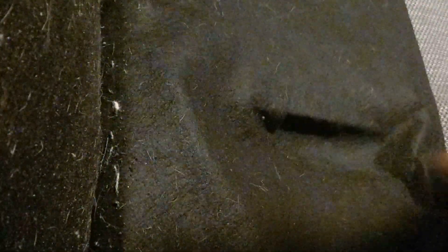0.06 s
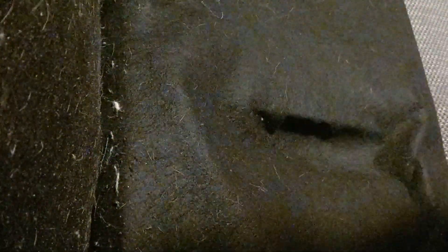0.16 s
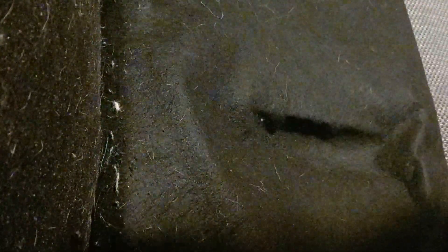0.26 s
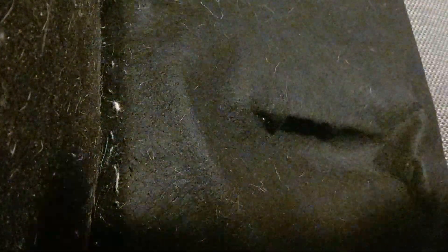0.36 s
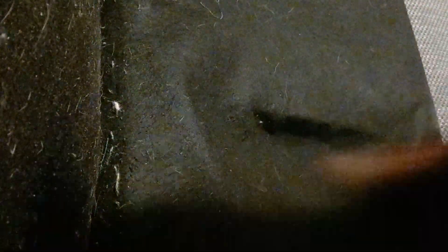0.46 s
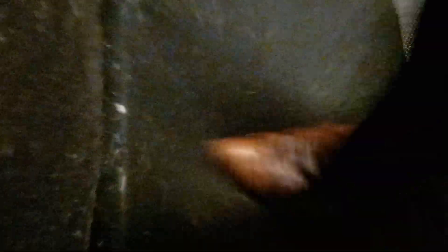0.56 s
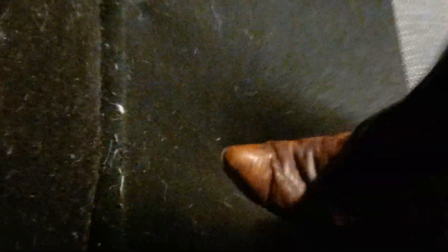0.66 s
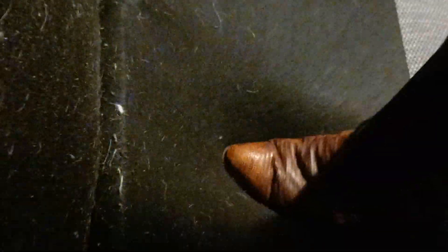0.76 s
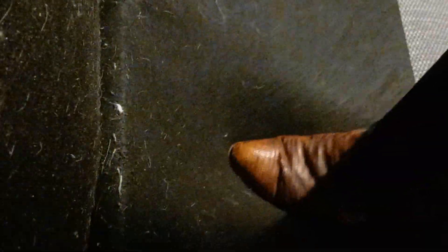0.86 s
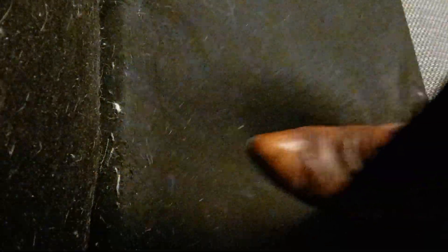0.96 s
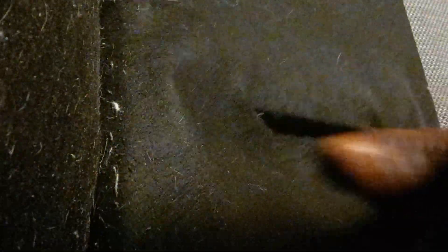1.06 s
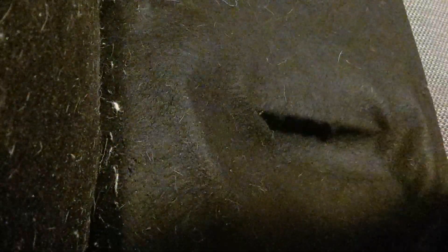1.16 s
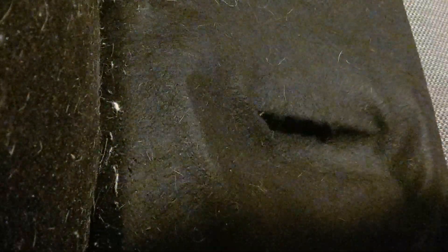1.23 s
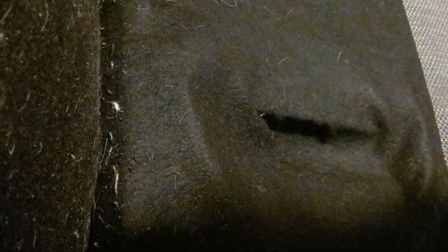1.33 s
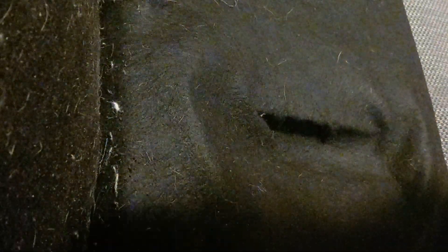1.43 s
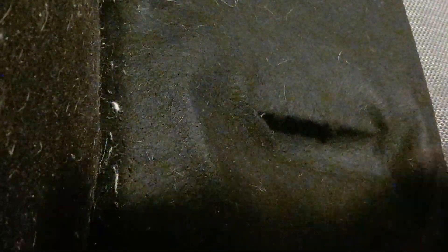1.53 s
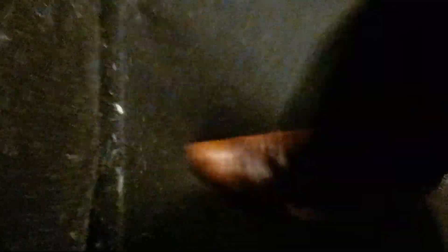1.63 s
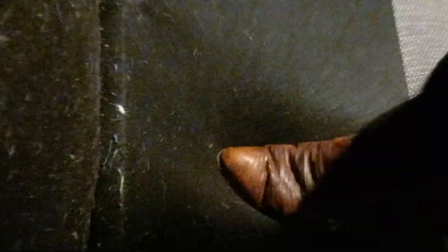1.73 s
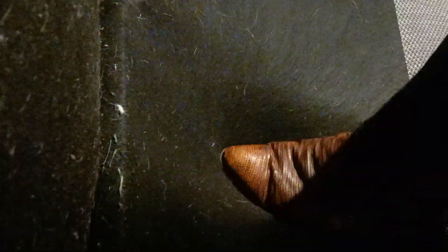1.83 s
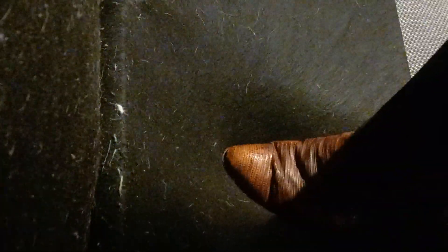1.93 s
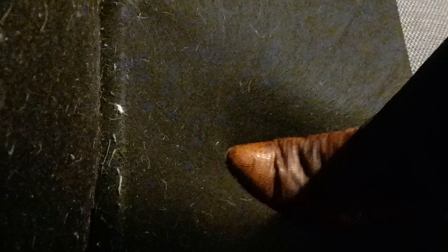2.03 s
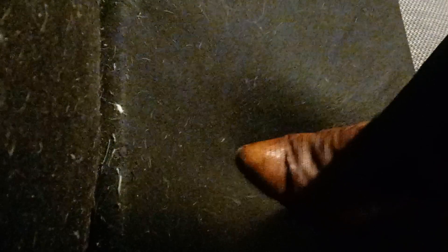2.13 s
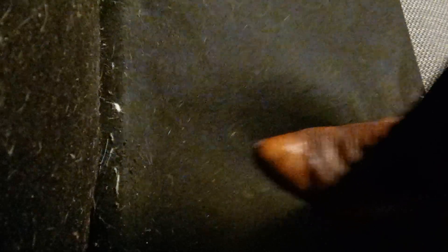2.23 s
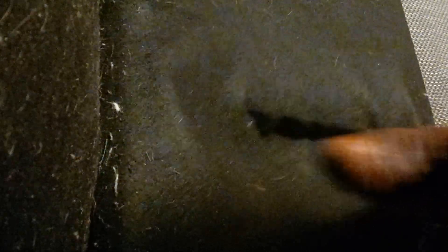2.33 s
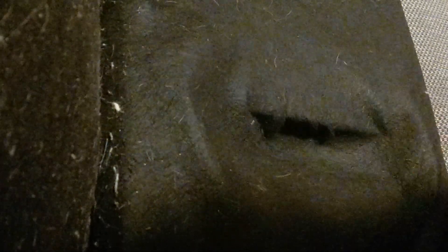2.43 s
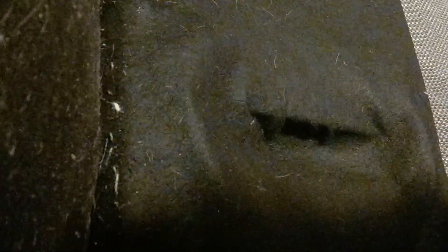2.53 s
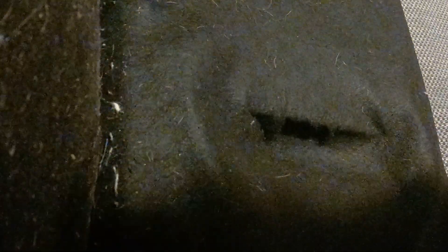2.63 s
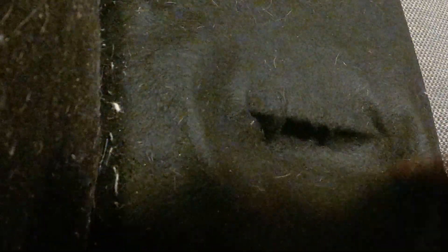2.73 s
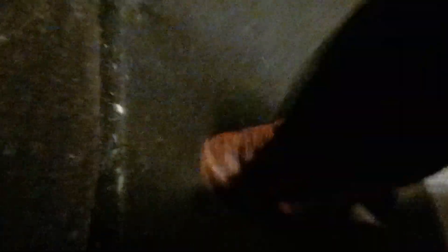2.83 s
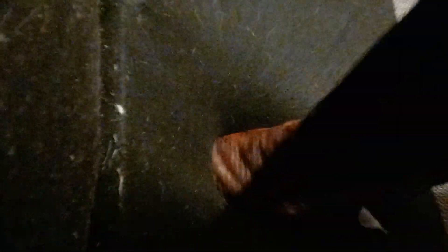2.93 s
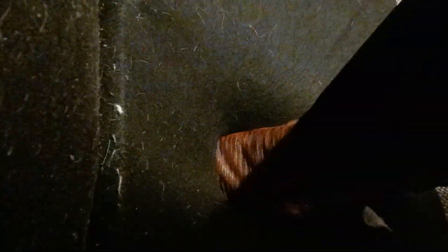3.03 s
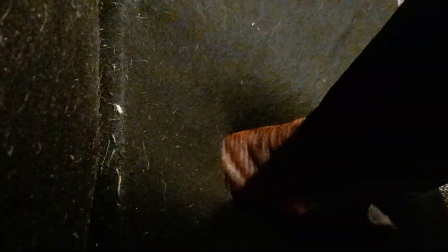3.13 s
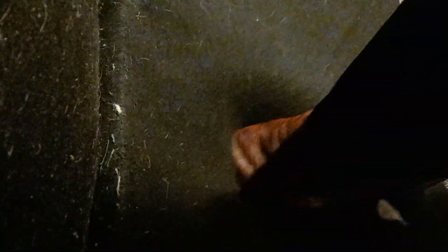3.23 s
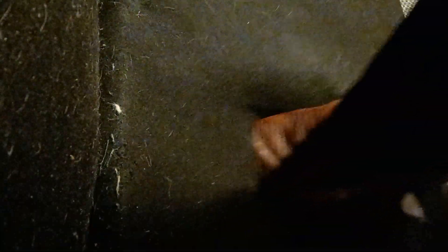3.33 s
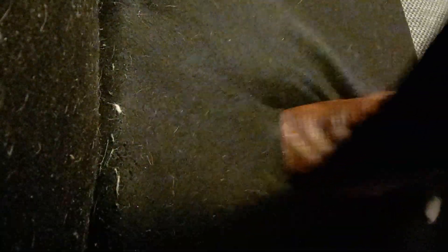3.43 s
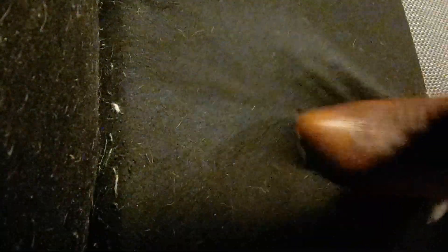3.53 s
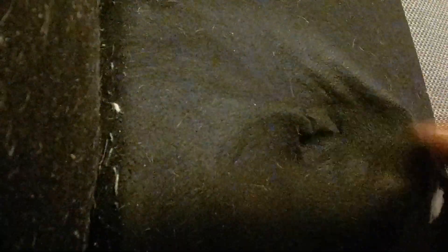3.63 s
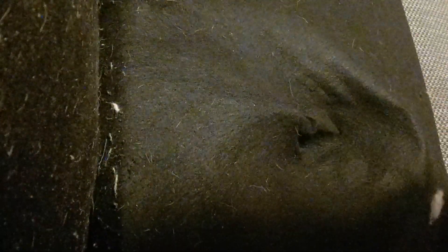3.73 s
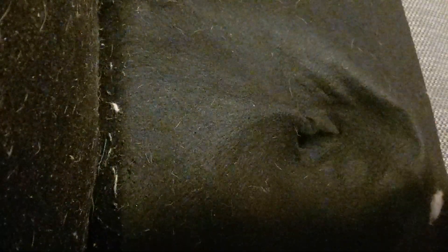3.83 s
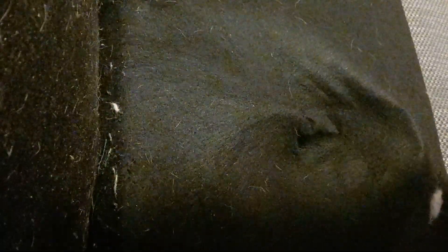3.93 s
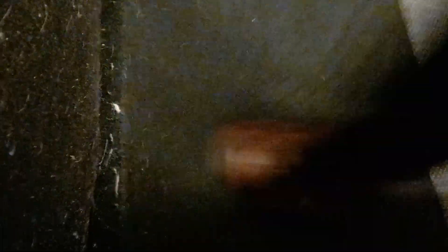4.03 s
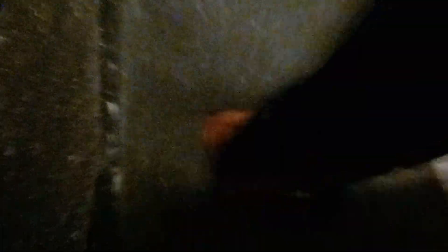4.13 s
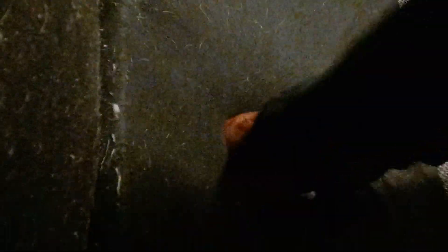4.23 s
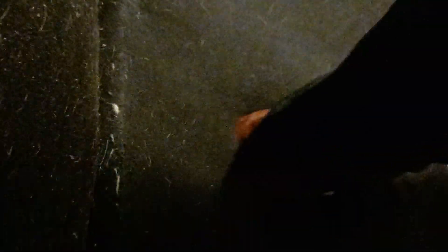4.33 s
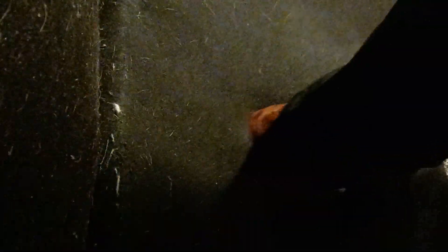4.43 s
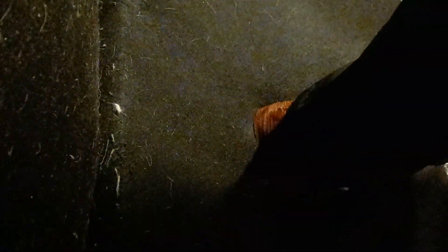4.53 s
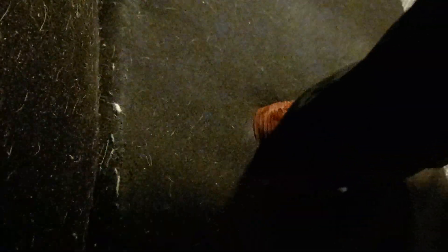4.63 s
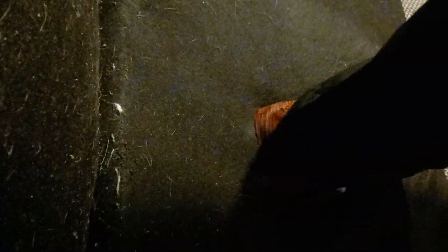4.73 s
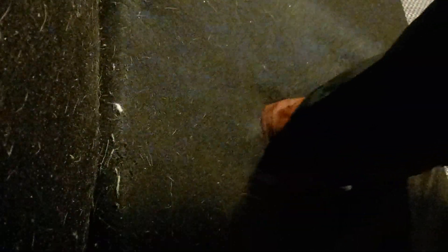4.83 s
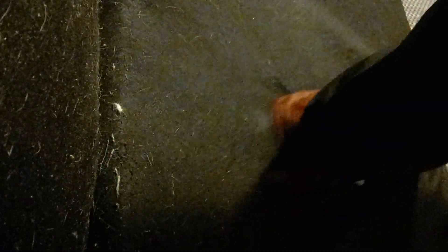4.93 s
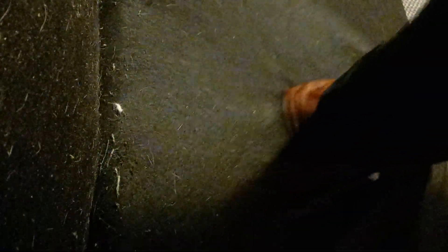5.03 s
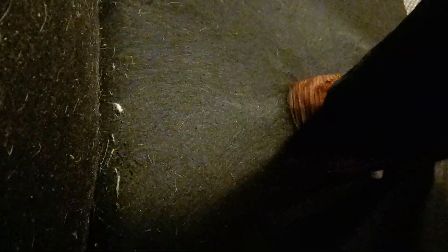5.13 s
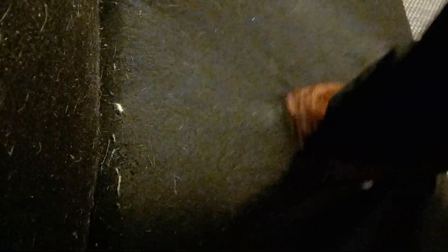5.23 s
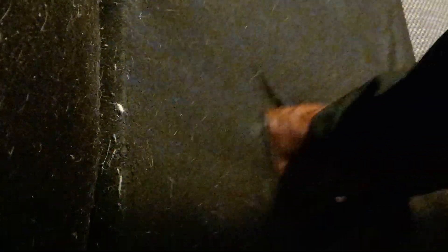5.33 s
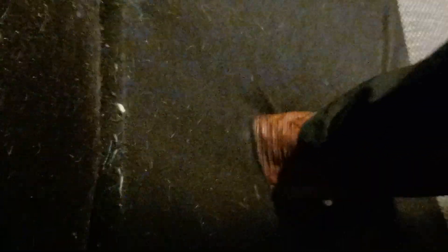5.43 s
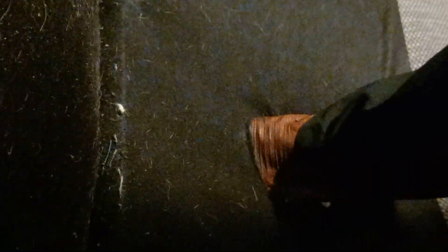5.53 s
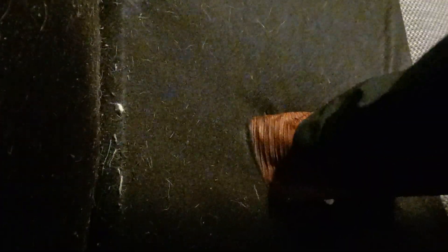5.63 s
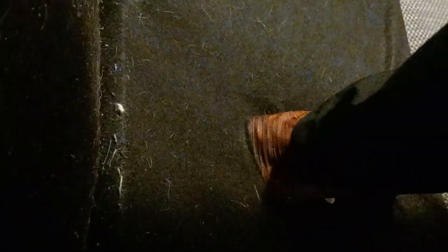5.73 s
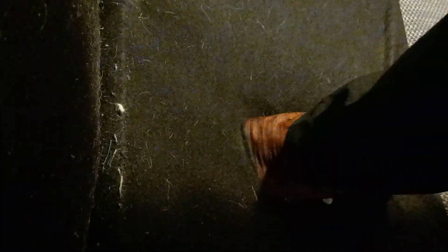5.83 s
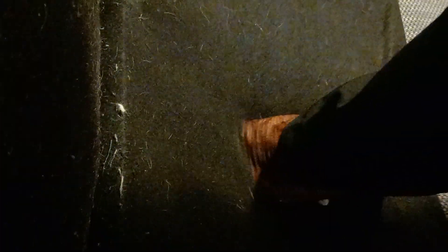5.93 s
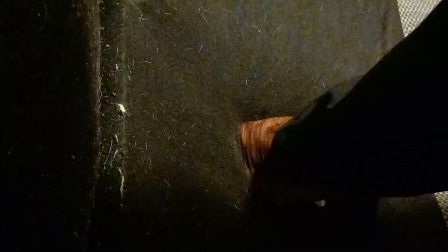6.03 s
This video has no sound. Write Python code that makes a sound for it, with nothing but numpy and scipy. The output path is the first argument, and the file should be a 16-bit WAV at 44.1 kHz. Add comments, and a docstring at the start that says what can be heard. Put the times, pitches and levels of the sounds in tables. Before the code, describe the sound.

Close, crunching stomps of a shoe into a sprung seat, with cloth rustle, dull thuds, hard frame knocks and low wind-like rumble.

```python
"""In a small room, a leather shoe stomps four times on a sprung cushion close to a two-port microphone.
Each stomp crunches stuffing and springs, as bursts of shaped noise, over a dull low-noise thud; short low
swings knock the frame, hardest in the last two stomps, and set decaying spring modes ringing.
Cloth rustles as modulated noise when the foot moves, springs and leather tick as short filtered snaps,
and moving air rumbles at both ports and buffets chiefly the left, over a faint background hush."""
import sys
import numpy as np
from scipy import signal
from scipy.fft import rfft, irfft
from scipy.io import wavfile
from scipy.ndimage import uniform_filter1d

SR = 44100
rng = np.random.default_rng(int(sys.argv[2]) if len(sys.argv) > 2 else 0)


def log_audio(samples):
    """Write samples as a 16-bit WAV file to the path given in sys.argv[1]."""
    # one column per channel
    frames = np.atleast_2d(samples).T
    # limit to full scale, then quantise
    limited = np.clip(frames, -1, 1)
    pcm = np.round(limited * 32767).astype(np.int16)
    wavfile.write(sys.argv[1], SR, pcm)


N = 267371
TIME = np.arange(N) / SR

# Likeness of the sound at the two ports. Each row: frequency in hertz, correlation from 0 to 1.
LIKENESS = [(60, 0.78), (150, 0.79), (300, 0.91), (650, 0.8), (1200, 0), (2500, 0.31), (4500, 0.036),
            (16000, 0)]


def amp(db):
    """Converts decibels to an amplitude ratio by the logarithmic law."""
    return 10 ** (np.asarray(db) / 20)


def evened(x):
    """Normalizes the mean power, giving an rms of 1."""
    return x / np.sqrt(np.mean(x ** 2) + 1e-20)


def read(points, hz):
    """Interpolates a spectrum table along a logarithmic frequency axis."""
    f, value = np.transpose(points)
    return np.interp(np.log(hz + 1), np.log(f + 1), value)


def colour(x, points):
    """Filters with zero phase, by a table of frequency in hertz and gain in decibels."""
    gain = amp(read(points, np.fft.rfftfreq(N, 1 / SR)))
    return irfft(rfft(x) * gain, N)


def add(mix, s, sound):
    """Superposes a sound on the mix from time s in seconds."""
    part = mix[..., max(round(s * SR), 0):][..., :sound.shape[-1]]
    part += sound[..., :part.shape[-1]]


def at_ports(pair, points):
    """Blends two unrelated signals to a partial coherence between ports, highest in the bass."""
    # Level difference, left minus right. Each row: frequency in hertz, difference in dB.
    lean_points = [(60, 9), (250, 0.5), (700, 0.5), (1200, -2), (2500, 3.5), (4000, 0.5), (5500, 0),
                   (7400, 4.5), (8500, -2.5), (10000, -5), (15000, -2.5)]
    hz = np.fft.rfftfreq(N, 1 / SR)
    a, b = rfft(pair)
    same = np.clip(read(LIKENESS, hz), -1, 1)
    lean = amp(read(lean_points, hz) / 2)
    left = a * lean
    right = (same * a + np.sqrt(1 - same ** 2) * b) / lean
    return evened(irfft(np.array([left, right]) * amp(read(points, hz)), N))


def flutter(hz, depth_db):
    """Random amplitude modulation: a gain through hz independent levels a second."""
    knots = rng.standard_normal(N // 20)
    return amp(depth_db * np.interp(TIME * hz, np.arange(len(knots)), knots))


def steadied(x, seconds):
    """Divides by the short-term rms, which evens out swells longer than the given time."""
    power = uniform_filter1d((x ** 2).mean(0), max(int(seconds * SR), 2))
    return x / np.sqrt(abs(power) + 1e-6)


def grains(per_s, spread_db, hiss):
    """Friction as a random train of tiny slips of uneven size over a smooth hiss."""
    sizes = amp(spread_db * np.minimum(rng.exponential(1, N), 4))
    slips = (rng.random(N) < per_s / SR) * sizes
    return evened(slips * rng.standard_normal((2, N))) + hiss * rng.standard_normal((2, N))


def push(s, hz, cycles):
    """A pressure pulse: a cosine under a Gaussian envelope centred on time s."""
    turns = (TIME - s) * hz
    near = abs(turns) < 4
    out = np.zeros(N)
    out[near] = np.cos(2 * np.pi * turns[near]) * np.exp(-(turns[near] / cycles) ** 2)
    return out


def press(s, rise_s, hold_s, fade_s, touch_db):
    """Level of a load growing from touch_db to full, held, then decaying 20 dB in each fade_s."""
    t = TIME - s
    growth_db = touch_db * np.clip(1 - t / rise_s, 0, 1)
    fade_db = -20 * np.maximum(t - rise_s - hold_s, 0) / fade_s
    onset = np.clip(t / 0.0015, 0, 1)  # 1.5 ms
    return onset * amp(growth_db + fade_db)


def swell(s, rise_s, fade_s, roundness):
    """An envelope that climbs 20 dB in rise_s to its peak at s and decays 20 dB in fade_s."""
    away = np.clip(np.maximum((s - TIME) / rise_s, (TIME - s) / fade_s), 0, 10)
    return amp(-20 * away ** roundness)


def hush():
    """Stationary background: steady Gaussian noise of fixed spectrum."""
    # Background spectrum. Each row: frequency in hertz, relative level in dB.
    hush_points = [(30, 8), (150, 1.5), (400, -3.5), (650, -0.5), (1000, -12), (2200, -24.5), (7500, -23.5),
                   (9500, -37), (16000, -37)]
    return amp(-58) * at_ports(rng.standard_normal((2, N)), hush_points)


def draught(movement):
    """Turbulence: eddies rumble unrelated at each port, stirred further by the moving foot."""
    # Spectrum of the eddies. Each row: frequency in hertz, gain in dB.
    air_points = [(20, -46), (38, -3), (60, -7), (95, 5), (140, -2.5), (220, -10), (350, -22), (600, -33.5),
                  (1200, -46.5), (3000, -75.5)]
    # Slow level of the draught at the left port. Each row: time in seconds, level in dB.
    left_curve = [(0, -26.5), (.42, -29), (.75, -39), (.9, -34), (1.15, -29.5), (1.35, -37.5),
                  (1.55, -28.5), (2, -34), (2.5, -28), (2.8, -30), (3.18, -43.5), (3.4, -35.5),
                  (3.72, -42.5), (3.9, -32.5), (4.48, -39), (4.75, -30), (5.1, -33), (5.8, -31)]
    # Slow level of the draught at the right port. Each row: time in seconds, level in dB.
    right_curve = [(0, -39), (.22, -55), (.44, -36.5), (.95, -44.5), (1.24, -30), (1.35, -51),
                   (1.75, -33.5), (2.1, -55), (2.45, -40), (2.75, -42.5), (3.18, -56), (3.35, -38),
                   (3.62, -55), (4.3, -36), (4.54, -57), (4.75, -44), (5.2, -48), (5.75, -32.5),
                   (6.05, -45)]
    wake_db, wake_lag_s = (-2, 7), 0.03  # left and right, over the level of the movement
    steady = amp([np.interp(TIME, *np.transpose(curve)) for curve in (left_curve, right_curve)])
    wake = amp(wake_db)[:, None] * np.interp(TIME - wake_lag_s, TIME, movement)
    rumble = colour(rng.standard_normal((2, N)), air_points)
    eddies = steadied(rumble * flutter(hz=44.97, depth_db=5), seconds=0.084)
    return np.hypot(steady, wake) * eddies


def buffets():
    """Pressure of strong gusts: single swings, chiefly at the left port, amid finer eddies."""
    # Gusts. Each row: centre in seconds, level in dB and pitch in hertz, both before the scaling below.
    gust_rows = [(0.246, -24, 140), (0.287, -18, 128), (0.313, -15, 175), (.331, -4.5, 178),
                 (0.42, -18, 114), (1.129, -14, 163), (1.164, -16, 187), (1.197, -20, 133),
                 (1.483, -19, 182), (1.577, -10, 188), (2.187, -17, 149), (2.281, -14.5, 174),
                 (2.671, -16.5, 167), (2.759, -15, 137), (3.079, -17, 199), (3.316, -14.5, 137),
                 (3.619, -22.5, 182), (3.897, -18.5, 164), (4.315, -19, 112), (4.523, -19.5, 170.5),
                 (4.549, -11, 135), (4.571, -15, 171), (4.7, -19, 114), (4.847, -14, 210),
                 (5.02, -9.5, 150), (5.496, -12.5, 183), (5.541, -17.5, 121), (5.89, -13.5, 155)]
    swings, knots = np.zeros((2, N))
    for s, db, hz in gust_rows:
        swings += amp(db) * push(s, hz * 0.89, cycles=0.57)
        knots += amp(db) * np.exp(-abs(TIME - s) / 0.012)
    fine = evened(colour(rng.standard_normal(N),
                         [(60, -4.5), (150, 3), (280, 0), (420, -10), (650, -28.5), (1300, -72)]))
    port_gain = amp([[-2.5], [-22]])  # left, right
    return port_gain * (swings + amp(-12) * knots * fine)


def rubbing():
    """Summed powers of the rubs give the levels of the foot's movement and of its fizz."""
    # Rubs. Each row: peak in seconds, level in dB, length between the points 20 dB down in seconds,
    # fizz relative to the rub in dB.
    rub_rows = [(.01, -54.5, .2, 1.5), (0.208, -56.5, 0.43, 2), (0.43, -58.5, 0.45, 1),
                (0.915, -63, 0.52, 0), (1.031, -45.5, 0.23, -2), (1.232, -64, .8, 4.5),
                (1.53, -64, 0.31, 1.5), (2.135, -57, 0.41, -2.5), (2.28, -46, 0.18, -3),
                (2.351, -49.5, 0.19, -0.5), (2.525, -64, .45, 4.5), (2.74, -66, 0.3, 2),
                (3.168, -69, 0.43, 1), (3.362, -54, .3, -3), (3.495, -51, 0.24, -2.5),
                (3.792, -60.5, 0.24, 0), (3.974, -68.5, 0.39, 0.5), (4.254, -54.5, 0.11, -3),
                (4.405, -57.5, 0.32, -6.5), (5.007, -67, 0.54, -0.5), (5.3, -59, 0.37, -7),
                (5.43, -55, 0.27, 1.5), (5.683, -67, 0.54, 2.5), (6.012, -59.5, 0.51, 4.5)]
    rise_share, roundness = 0.49, 1.65  # roundness 1 is a pointed peak
    body, fizz = np.zeros((2, N))
    for s, db, length, fizz_db in rub_rows:
        rub = amp(db) * swell(s, rise_share * length, (1 - rise_share) * length, roundness)
        body += rub ** 2
        fizz += (rub * amp(fizz_db)) ** 2
    return np.sqrt(body), np.sqrt(fizz)


def rustle(movement, fizz):
    """Sliding friction of trouser cloth and leather on the cover, its treble weighted apart."""
    # Spectrum of rubbed cloth. Each row: frequency in hertz, relative level in dB.
    cloth_points = [(150, -4), (550, 11), (1000, 4.5), (2200, -0.5), (3600, 2.5), (5500, 2), (7700, 2.5),
                    (9200, -10), (14000, -8.5), (16000, -12)]
    slips = grains(per_s=3500, spread_db=1, hiss=1) * flutter(hz=83.5, depth_db=1.45)
    fibres = at_ports(slips, cloth_points)
    top = colour(fibres, [(4000, -41.5), (9000, 0)])
    return amp(3.5) * (movement * (fibres - top) + fizz * top)


def faint_ticks(count):
    """Random releases scattered while the foot leans on the springs, as (s, dB, Hz)."""
    times = rng.uniform(5.6, 6.06, count)  # seconds
    chances = rng.standard_normal((count, 2))
    # levels spread by 4 dB, pitches by a quarter octave
    return [(s, -39 + 4 * loud, 5500 * 2 ** (0.25 * high)) for s, (loud, high) in zip(times, chances)]


def ticks():
    """Stick-slip release: loaded springs and creased leather let go with a snap and a short fizz."""
    # Ticks. Each row: time in seconds, level in dB before the common 1 dB boost, pitch in hertz.
    tick_rows = [(0.4935, -27.5, 2500), (2.0557, -28, 5800), (2.7793, -27, 2720), (2.8466, -18.5, 1700),
                 (2.8786, -35, 6030), (3.468, -29.5, 2450), (4.022, -30.5, 2160), (4.055, -22, 7000),
                 (4.0802, -14, 2960), (4.421, -38.5, 4500), (4.444, -34, 4370), (5.1475, -42.5, 5600),
                 (5.443, -41, 4500), (5.6044, -42, 5070), (5.7578, -41.5, 4660), (5.82, -43, 5600),
                 (5.9023, -20, 3520), (6.048, -33, 5000)]
    # Spectrum of a snap. Each row: frequency in hertz, gain in dB.
    snap_points = [(300, -22), (1300, 11.5), (2000, -4.5), (3500, 0), (5000, -3), (8000, 0), (9500, -15.5),
                   (16000, -16)]
    out, t = np.zeros((2, N)), TIME[:4096]
    hz = np.fft.rfftfreq(len(t), 1 / SR)
    lead = 64  # samples left for the part of the zero-phase filter that precedes the release
    for s, db, pitch in tick_rows + faint_ticks(count=4):
        octaves_away = np.log2((hz + 1) / pitch)
        band = amp(read(snap_points, hz)) / np.sqrt(1 + (2 * octaves_away) ** 2)
        decay = np.exp(-t / 0.0008) + amp(-24) * np.exp(-t / 0.006)
        slips = rng.standard_normal((2, len(t))) * decay
        slips[:, 0] = 4  # the release itself reaches both ports
        snap = irfft(rfft(np.roll(slips, lead, axis=1)) * band)
        add(out, s - lead / SR, amp(db + 1) * snap / abs(snap).max())
    return out


def chatter(count):
    """Repeated impact: the frame bounces under the sole in ever weaker, lower knocks."""
    start_s, gap_s, first_db, first_hz, ring_db = 4.0812, 0.0083, -4, 515, -13
    fade_db_per_s, sag_oct_per_s = 220.5, 30
    return [(start_s + t, first_db - fade_db_per_s * t, first_hz * 2 ** (-sag_oct_per_s * t), ring_db)
            for t in np.arange(count) * gap_s]


def knocks():
    """Impact and modal decay: each knock is a low swing, a seat shudder and ringing springs."""
    # The sole meets a spring or bottoms out on the frame. Each row: time in seconds, level of the low
    # swing in dB, pitch in hertz, drive to the seat and springs relative to the swing in dB.
    knock_rows = [(0.5052, -21, 263, -28), (0.53, -11, 230, -40), (.609, -21, 533, -19),
                  (1.6045, -18, 222, -25.5), (1.633, -23, 347, -21), (1.705, -27, 600, -24),
                  (2.0557, -34, 597, 5.5), (2.8465, -3.5, 430, -1.5), (2.8475, -14.5, 1024, -23),
                  (2.866, -14, 376, -13), (3.4709, -33, 540, -8), (4.0725, -12, 703, -16),
                  (4.0755, -10.5, 1160, -5.5), (4.117, -6, 264, -20), (4.119, -14, 780, -15),
                  (4.1504, -11.5, 117.8, -32), (5.0161, -28.5, 523, -13.5), (5.444, -40.5, 700, -13)]
    # Modes of springs and frame. Each row: frequency in hertz, level in dB, time to decay 60 dB in seconds.
    spring_modes = [(199.6, -24.5, 0.5), (260.6, -23.5, 0.5), (360, -24, 0.46), (390.5, -25, 0.72),
                    (405, -23, 0.76), (426, -30, 0.6), (446, -31, 0.69), (455, -50, 0.55), (587, -39, 0.87),
                    (620, -34.5, 0.71), (650, -36, 0.19), (880, -47, 0.27), (1630, -62, 0.6)]
    # Spectrum of the whole seat just after a knock. Each row: frequency in hertz, relative level in dB.
    seat_points = [(150, -5), (280, -3), (450, 9), (620, 3), (900, -5), (1400, -29.5), (2500, -26),
                   (6000, -54), (12000, -59)]
    blows, kicks = np.zeros((2, N))
    for s, db, hz, ring_db in knock_rows + chatter(count=4):
        # the harder the knock, the sharper its edge
        edge = amp(-8.5) * amp(db * 0.37) * push(s, hz * 2.06, cycles=0.27)
        blows -= amp(db) * (push(s, hz, cycles=0.68) + edge)
        add(kicks, s, amp([db + ring_db]))
    t = TIME[:SR]
    ring = sum(amp(db - 60 * t / t60) * np.sin(2 * np.pi * hz * t) for hz, db, t60 in spring_modes)
    fading = amp(-15.5) * np.exp(-t / 0.012) + amp(-24) * np.exp(-t / 0.11)
    # the powers of overlapping shudders add
    shudder_level = np.sqrt(abs(signal.fftconvolve(kicks ** 2, fading ** 2)[:N]))
    shudder = shudder_level * at_ports(rng.standard_normal((2, N)), seat_points)
    return blows + shudder + signal.fftconvolve(kicks, ring)[:N]


def stomps():
    """Compression: slips crunch as the sole sinks and settles, the padding puffs, the seat thuds."""
    # Stomps. Each row: touch of the sole in seconds, travel in seconds, crunch in dB, treble gain as the
    # stuffing packs in dB, delay of settling in seconds, settling in dB, creep in dB, thud in dB before
    # the cut below, thud rise in seconds, thud fade by 20 dB in seconds.
    stomp_rows = [(.492, 0.04, -24, 0, 0.12, -34.5, -38.5, -17, 0.022, 0.099),
                  (1.587, 0.04, -24.5, 0.5, 0.12, -35.5, -38.5, -19, 0.022, 0.15),
                  (2.777, .042, -26.5, 1.5, 0.11, -48, -60, -17, 0.048, 0.12),
                  (4.021, 0.061, -25.5, -4.5, 0.16, -38.5, -39.5, -16.5, 0.088, 0.047)]
    # Spectrum of the crunch. Each row: frequency in hertz, relative level in dB.
    crunch_points = [(300, -30), (900, 2), (1600, 1.5), (2300, -3), (3400, 0), (4600, -0.5), (6000, 0),
                     (7000, 0.5), (7800, 1.5), (8400, -5.5), (9100, -12), (12500, -10.5), (16000, -12)]
    # Spectrum of the padding. Each row: frequency in hertz, relative level in dB.
    padding_points = [(100, -42), (250, 3.5), (450, -2), (680, -6.5), (900, -13), (1500, -56), (3000, -42)]
    # Spectrum of the thud. Each row: frequency in hertz, relative level in dB.
    thud_points = [(20, -37), (45, -4), (70, 5), (115, 4), (200, 2.5), (300, -6.5), (600, -52)]
    touch_db, hold_s = -20, 0.019
    crush, bright, weight = np.zeros((3, N))
    for (s, travel_s, crunch_db, treble_db, settle_s, settle_db, creep_db,
         thud_db, thud_rise_s, thud_fade_s) in stomp_rows:
        sink = amp(crunch_db) * press(s, travel_s, hold_s, 0.018, touch_db)
        settle = amp(settle_db) * swell(s + settle_s, 0.092, 0.028, roundness=1) * (TIME > s)
        creep = amp(creep_db) * press(s, travel_s, hold_s, 0.17, touch_db)
        stroke = np.sqrt(sink ** 2 + settle ** 2 + creep ** 2)
        crush += stroke
        bright += stroke * amp(treble_db)
        weight += amp(thud_db) * press(s, thud_rise_s, 0.034, thud_fade_s, touch_db=-13.5)
    clumps = grains(per_s=5000, spread_db=0, hiss=1) * flutter(hz=432, depth_db=-2)
    crunch = at_ports(steadied(clumps, seconds=0.061), crunch_points)
    dull = colour(crunch, [(2000, 0.5), (4000, -2), (6500, -33.5)])
    fluff = at_ports(grains(per_s=700, spread_db=0.5, hiss=0.18), padding_points)
    padding = steadied(fluff, seconds=0.0214)
    thud = steadied(at_ports(rng.standard_normal((2, N)), thud_points), seconds=0.0208)
    # the padding sounds when it is both loaded and moving
    puff = amp(0.5) * np.sqrt(crush * weight) * padding
    return crush * dull + bright * (crunch - dull) + puff + amp(-2.5) * weight * thud


def room(x):
    """Reverberation: sparse reflections of random sign, each band decaying at its own rate."""
    # Decay of the room. Each row: frequency in hertz, time to decay 60 dB in seconds.
    decay_points = [(100, 0.45), (500, 0.65), (1500, 0.5), (5000, 0.51), (14000, 0.66)]
    # reflections begin 6 ms after the direct sound
    taps = rng.standard_normal((2, SR)) * (rng.random((2, SR)) < 0.08) * (TIME[:SR] > 0.006)
    hz, t, z = signal.stft(taps, SR, nperseg=256)
    same = np.clip(read(LIKENESS, hz), -1, 1)[:, None]
    z[1] = same * z[0] + np.sqrt(1 - same ** 2) * z[1]
    decay = amp(-60 * t / read(decay_points, hz)[:, None])
    tail = signal.istft(z * decay, SR, nperseg=256)[1]
    wet = signal.fftconvolve(x, tail / np.linalg.norm(tail[0]), axes=1)[:, :N]
    return colour(wet, [(100, -5.5), (500, -22), (1200, -9.5), (3000, -15.5), (12000, -23)])


def scene():
    """Superposition: cushion and foot excite the room; air and hush reach the ports directly."""
    movement, fizz = rubbing()
    near = stomps() + knocks() + rustle(movement, fizz) + ticks()
    return near + room(near) + draught(movement) + buffets() + hush()


def record(dry):
    """Band limiting and clipping: the deepest bass is cut, peaks stop near full scale, treble ends."""
    bass_cut = colour(dry, [(15, -10), (30, -15), (42, -25), (55, 0.5)])
    held = np.clip(bass_cut, -0.96, 0.96)
    lowpass = signal.firwin(511, 15950, window=("kaiser", 9), fs=SR)  # cutoff in hertz
    return signal.oaconvolve(held, lowpass[None], "same")


dry = scene()
out = record(dry)
log_audio(out)
```